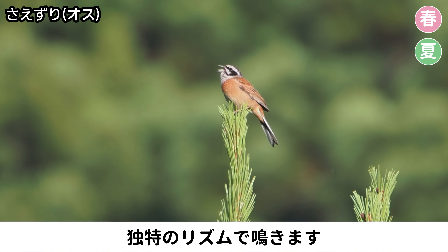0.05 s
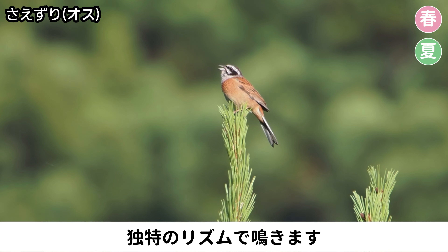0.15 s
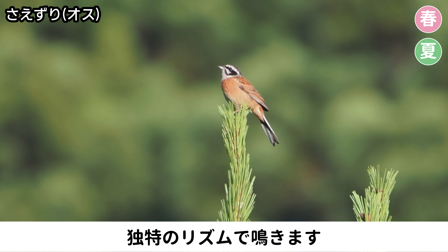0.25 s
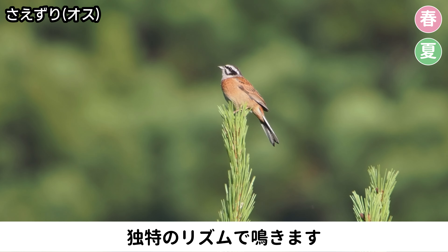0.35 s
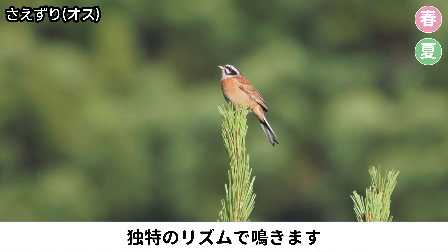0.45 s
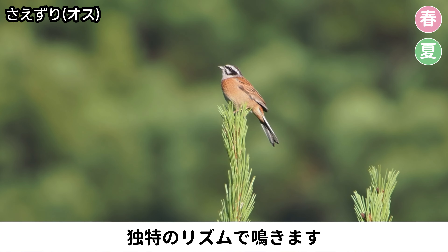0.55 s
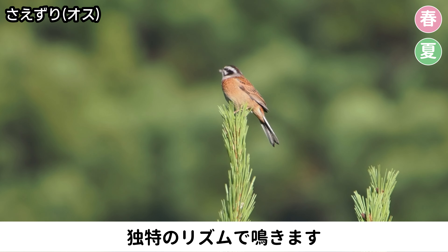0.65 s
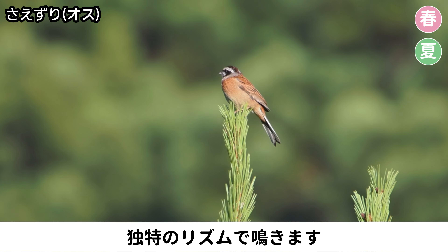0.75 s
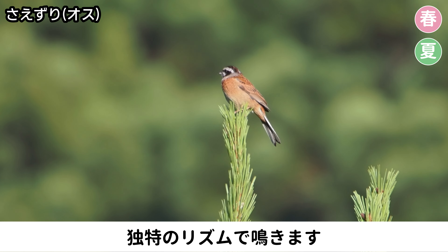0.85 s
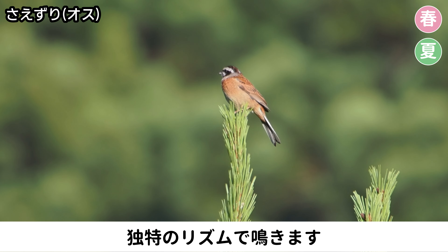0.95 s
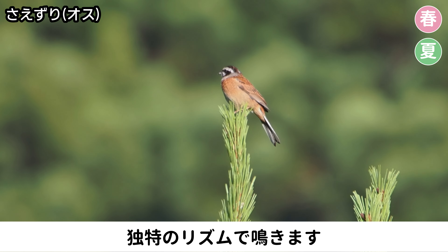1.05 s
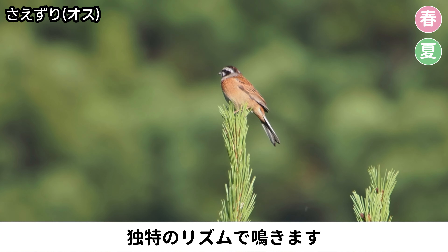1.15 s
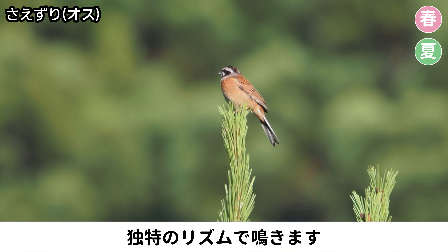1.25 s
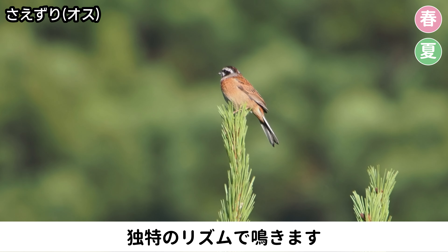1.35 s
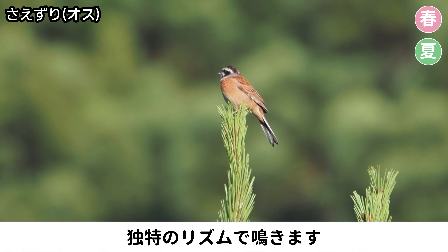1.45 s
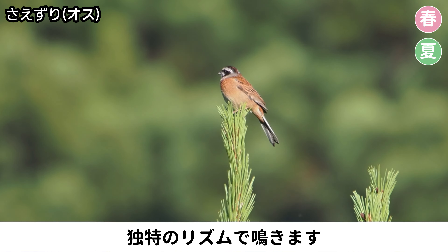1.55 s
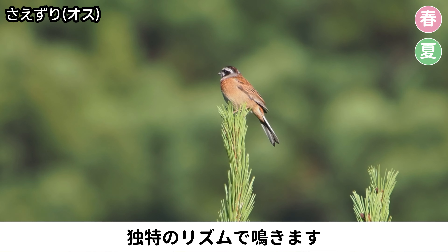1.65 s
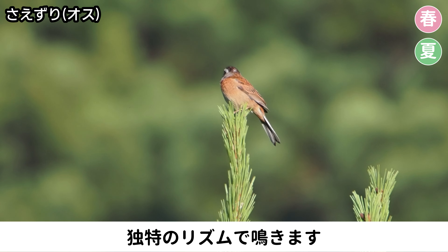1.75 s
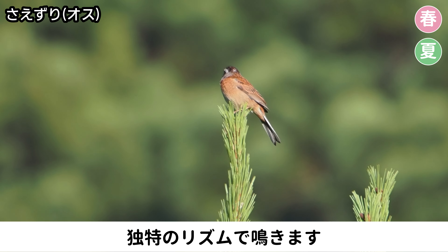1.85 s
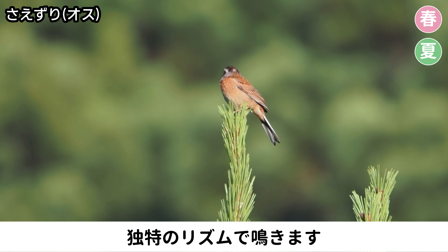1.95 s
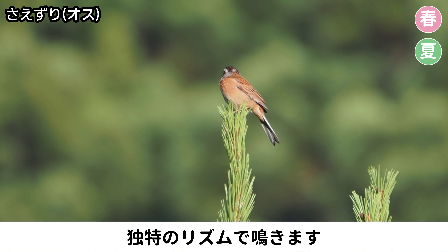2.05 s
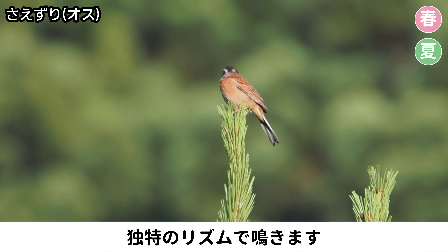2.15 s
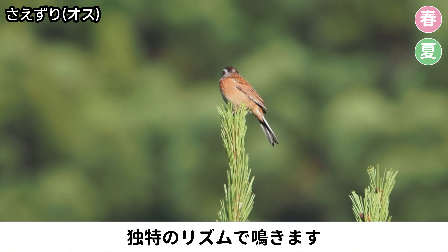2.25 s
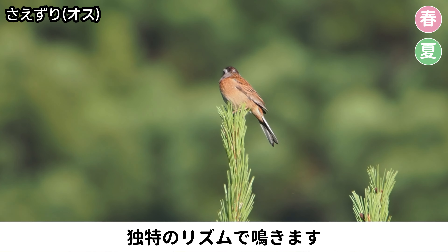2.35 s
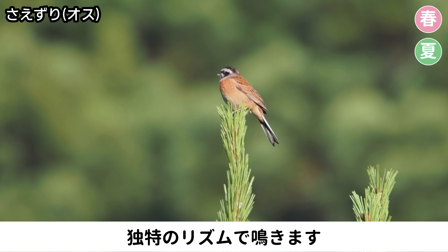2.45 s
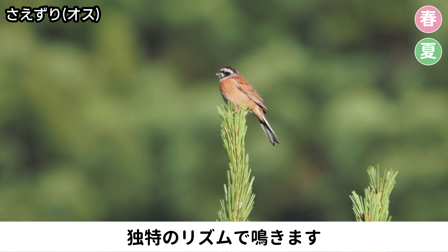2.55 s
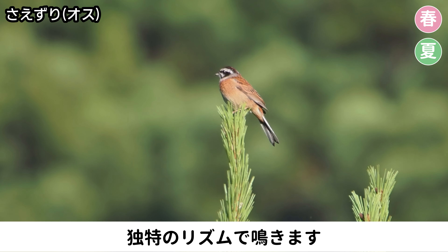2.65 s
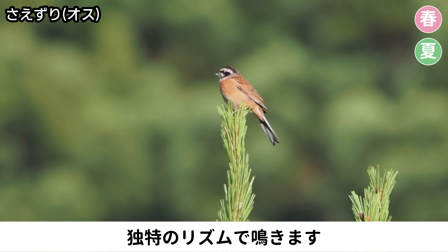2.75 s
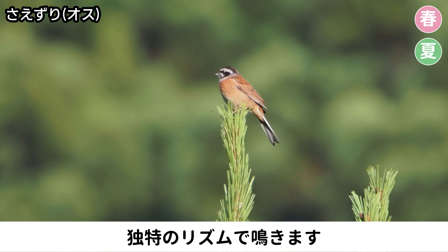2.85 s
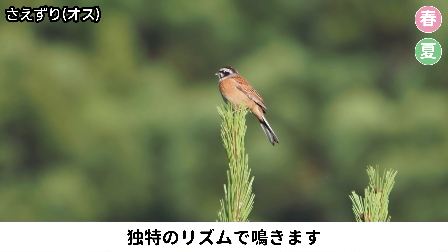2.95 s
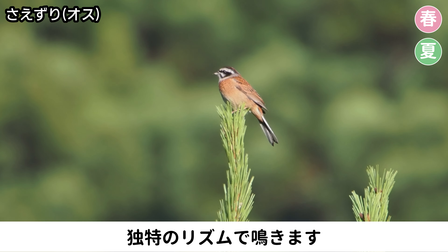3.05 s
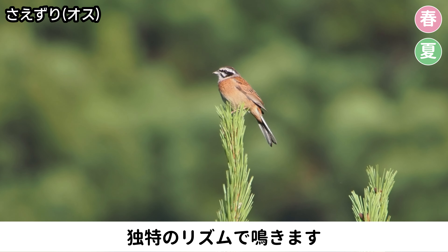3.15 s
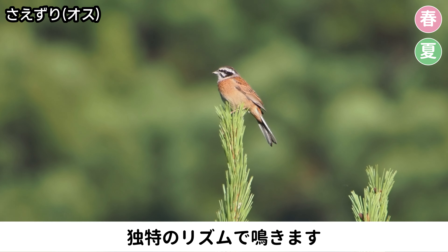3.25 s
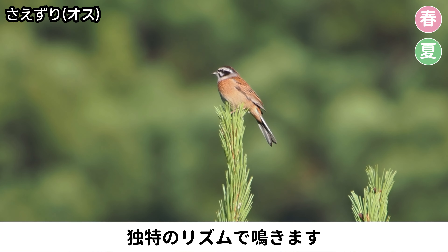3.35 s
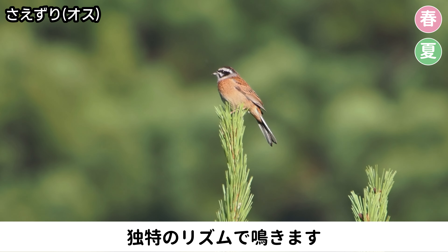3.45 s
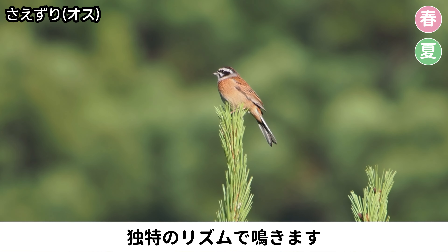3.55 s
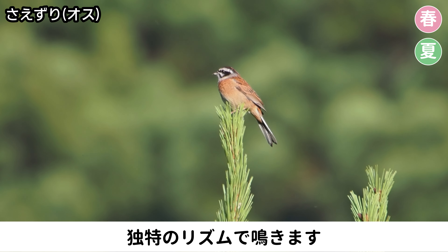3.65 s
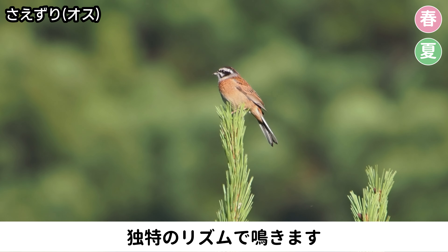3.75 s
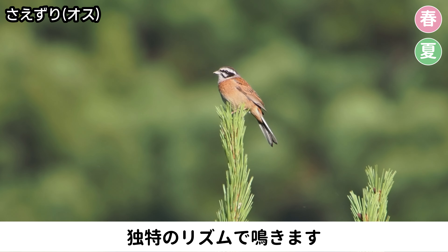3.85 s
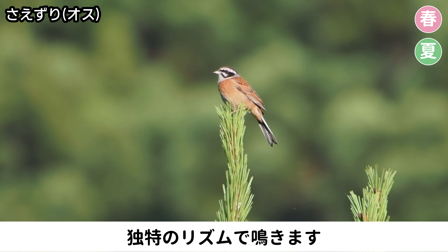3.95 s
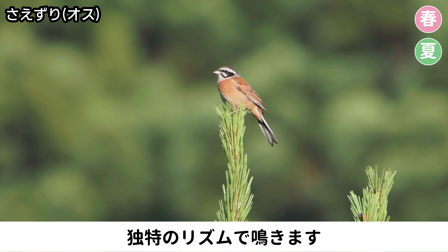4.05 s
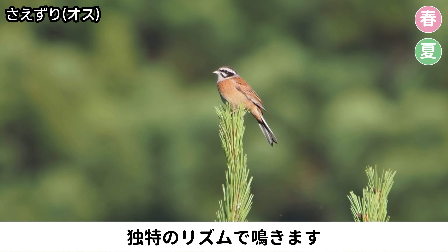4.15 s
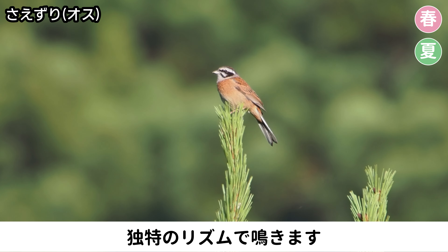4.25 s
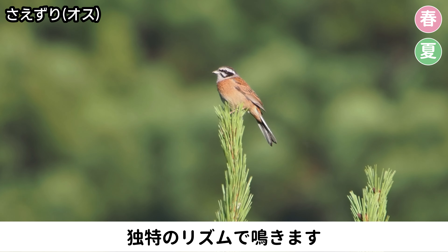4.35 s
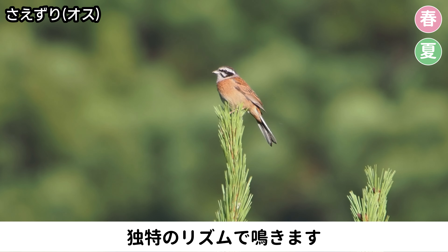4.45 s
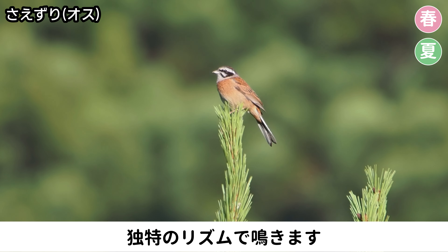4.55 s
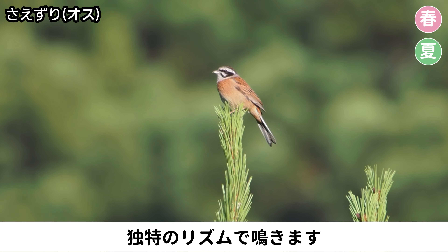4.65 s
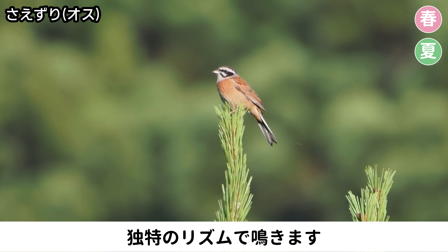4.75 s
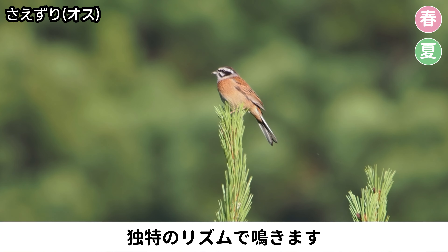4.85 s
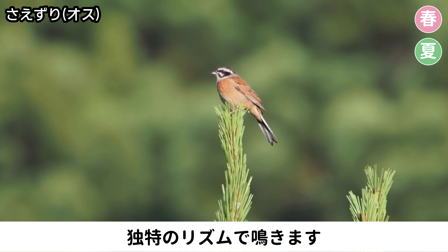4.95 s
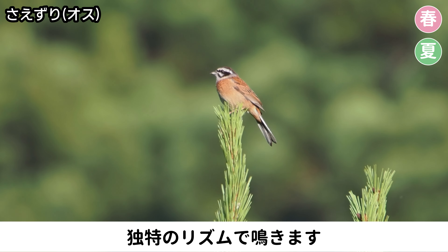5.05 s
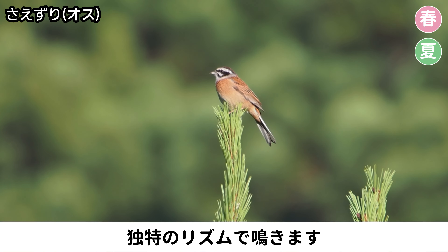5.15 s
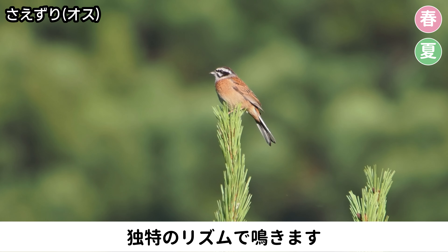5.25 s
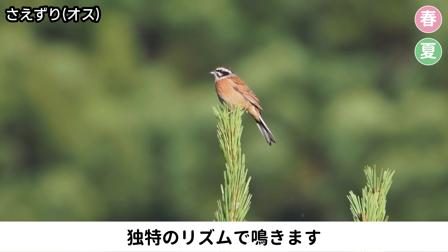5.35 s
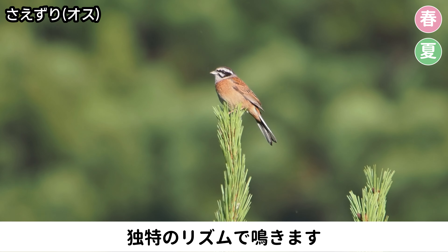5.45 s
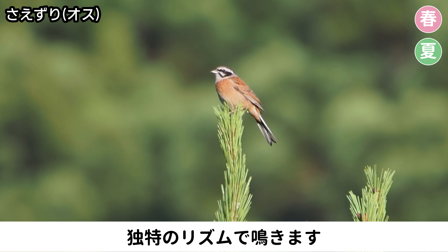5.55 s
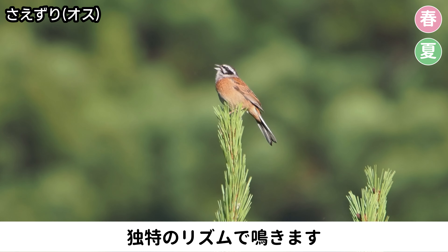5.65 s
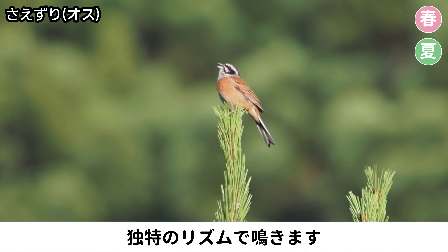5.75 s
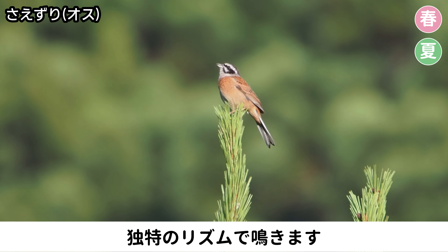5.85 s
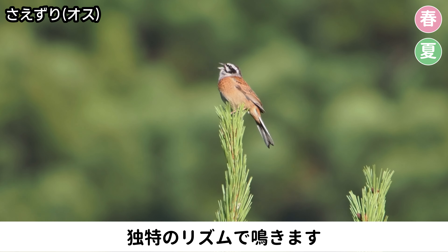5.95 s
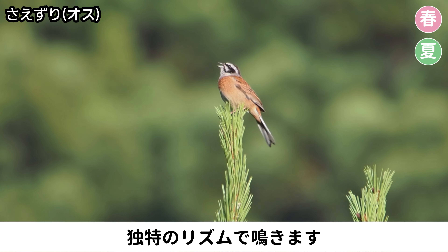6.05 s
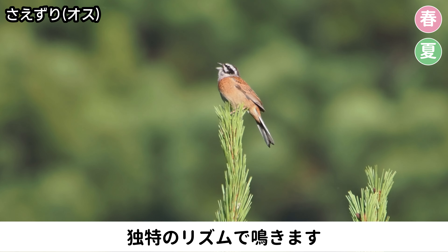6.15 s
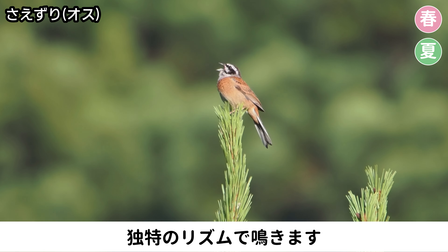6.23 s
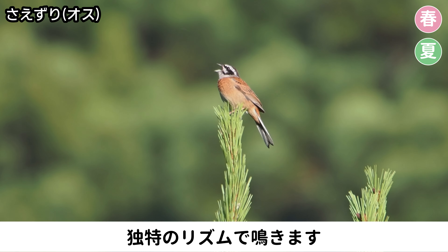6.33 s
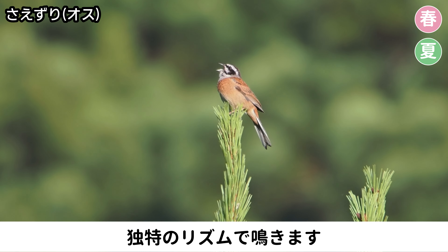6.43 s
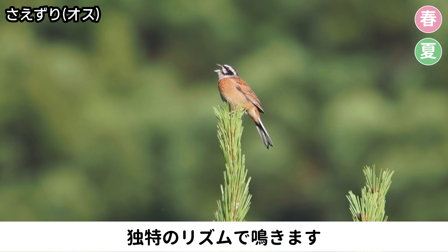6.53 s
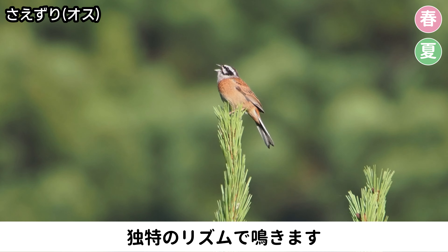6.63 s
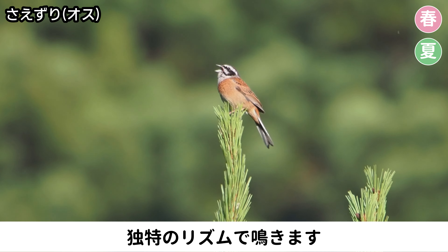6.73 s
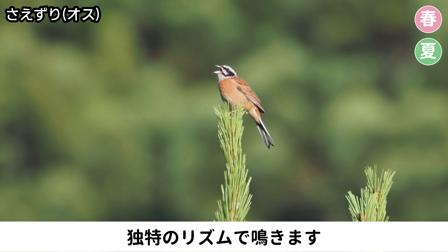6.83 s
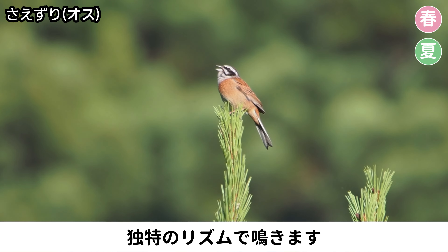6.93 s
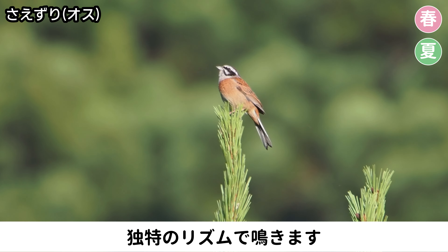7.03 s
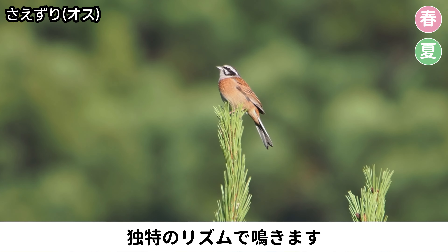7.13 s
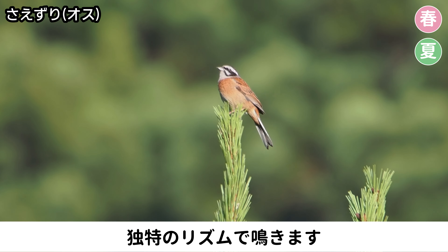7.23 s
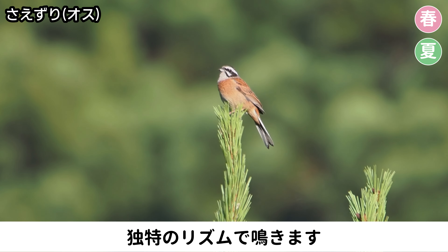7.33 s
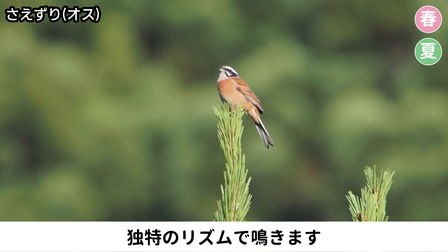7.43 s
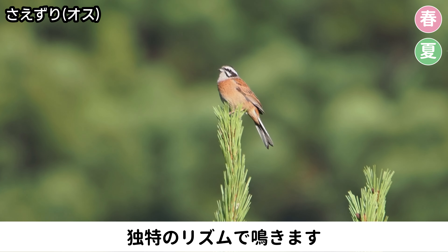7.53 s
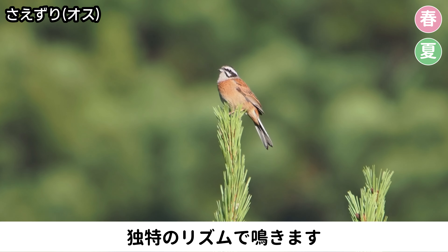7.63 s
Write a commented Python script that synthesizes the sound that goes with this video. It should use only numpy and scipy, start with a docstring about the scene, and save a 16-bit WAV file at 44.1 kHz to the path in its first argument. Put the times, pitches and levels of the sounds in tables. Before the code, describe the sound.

A wooded hillside in stereo: a steady mid-high airy rush, thin hiss above, and soft low rumble whose deepest part swells gently around 5.3 s. At 0 s a bunting is ending its phrase with two quick ticks and a trilled flourish, done by about 0.3 s, leaving a short leafy echo. Through the long pause, very faint far birds give upward whistles and sweeping notes, with small thin high buzzes scattered from 1 to 6.2 s, all smeared by trees. From 4.4 to 5.3 s six soft low hoots quicken slightly. At 5.35 s another bird gives a lower chirp, then a short toot. At 5.8 s the bunting sings its whole phrase, loud and clear: two down-slurred chews, rising swoops, a flick, a wavering high note, dry ticks and a trilled flourish, ending about 7.2 s. Echo fades under faint whistles until the end.

```python
"""On a wooded hillside a bunting sings from a pine top: the end of one phrase, a long pause, a whole phrase.
Its song is gliding, nearly pure tones; another bird gives a lower chirp and a toot just before the second phrase.
Far birds whistle and hoot as near-sinusoids, and buzz by frequency modulation. Decaying noise, convolved with
every note, is the scatter from foliage. Shaped noise gives the low rumble and a steady rush with a thin hiss on top."""
import sys
import numpy as np
from scipy import signal
from scipy.fft import rfft, irfft
from scipy.io import wavfile
from scipy.ndimage import uniform_filter1d

SR = 44100
rng = np.random.default_rng(int(sys.argv[2]) if len(sys.argv) > 2 else 0)


def generate_wav(sig):
    """Save sig (samples, or channels by samples) to the path in sys.argv[1] as 16-bit PCM at SR."""
    pcm = np.round(np.clip(np.atleast_2d(sig).T, -1, 1) * 32767).astype(np.int16)
    wavfile.write(sys.argv[1], SR, pcm)


N = 339129
LEAD = SR // 2  # samples of song before time zero, so that its echoes are already under way

# The bunting's phrase: (t/s into the phrase, syllable or note, pitch factor, length factor, relative level/dB)
PHRASE = [ (0, "chew", 1, 1, 0), (.277, "chew", .962, 1.08, 1.5), (.458, "swoop", 1, 1, 0),
          (.6055, "flick", 1, 1, 0), (.674, "swoop", .996, 1, -1), (.883, "wave", 1, 1, 0),
          (1.0005, "chip", 1, 1, 0), (1.053, "tick", 1, 1, 0), (1.107, "tick", 1.005, 1, 0),
          (1.1775, "flourish", 1, 1, 0)]
# Onsets of the phrase, sung twice; the first is already ending at time zero: (t/s)
PHRASE_STARTS_S = [-1.0672, 5.783]
# Notes sung as one syllable; a doubled note is the second side of the syrinx, higher and softer:
# name: (t/s after onset, note, pitch factor, relative level/dB)
SYLLABLES = { "chew": [(0, "pip", 1, 0), (.029, "slur", 1, 0)], "swoop": [(0, "tsip", 1, 0),
             (0, "tsip", 1.125, -6), (.016, "tsee", 1, 0), (.0385, "rise", 1, 0)],
             "flourish": [(0, "dip", 1, 0), (0, "dip", 1.19, -3), (.038, "trill", 1, 0),
             (.074, "tail", 1, 0)]}


def song():
    """Hierarchy of song: each phrase unfolds into syllables, each syllable into notes."""
    notes = []
    for start in PHRASE_STARTS_S:
        for s, name, pitch, length, db in PHRASE:
            if start + s <= -LEAD / SR:
                continue
            for lag, note, interval, note_db in SYLLABLES.get(name, [(0, name, 1, 0)]):
                notes.append((start + s + lag * length, note, pitch * interval, length, db + note_db))
    return notes


# Direction of the singer by pitch: (f/Hz, left minus right level/dB)
SINGER_PAN = [(3600, -2.6), (4100, -1.8), (4400, 0), (4700, .7), (5000, -.6), (6300, .8), (8000, .4)]


def singer():
    """Strong direct sound: the bunting's whistles stand well above their scatter."""
    whistles = syrinx(song(), SINGER_PAN, octave_db=-43)
    return woods(whistles, twigs_db=-11, trees_db=-16.0, twigs_t60=0.084, trees_t60=1.0)


# A bird some way off: (t/s, note, pitch factor, length factor, relative level/dB)
NEIGHBOUR = [(5.355, "chirp", 1, 1, 0), (5.414, "toot", 1, 1, 0)]


def neighbour():
    """Weaker direct-to-reverberant ratio: a bird some way off gives a chirp and a toot amid more scatter."""
    whistles = syrinx(NEIGHBOUR, [(1700, -1.5), (2600, -2.5)], waver=0.0051)
    return woods(whistles, twigs_db=-4.5, trees_db=-6.5, twigs_t60=0.25, trees_t60=1.6)


# Notes whose pitch flutters at the start: note: flutter depth f/Hz
FLUTTER_HZ = {"trill": 150, "sweep": 190}


def syrinx(notes, pan_points, waver=0.0048, shimmer_db=1.15, octave_db=-44, flutter_hz=205, flutter_s=0.035):
    """Near-sinusoidal oscillation: a fundamental and faint octave, with wavering pitch and shimmering level."""
    out = np.zeros((2, LEAD + N))
    for s, note, pitch, length, db in notes:
        t, hz, loud = gesture(note, pitch, length)
        # full depth for the first half of flutter_s, then fading out
        flutter_fade = np.clip(2 - 2 * t / flutter_s, 0, 1)
        flutter = FLUTTER_HZ.get(note, 0) * np.sin(2 * np.pi * flutter_hz * t) * flutter_fade
        phase = phase_of(hz * (1 + waver * walk(600, len(t))) + flutter)
        tone = np.sin(phase) + undb(octave_db) * np.sin(2 * phase)
        shimmer = undb(db + shimmer_db * walk(252, len(t)))
        add(out, s, tone * loud * shimmer * pan(at_pitch(pan_points, hz)))
    return out


# Simple notes, each one bowed glide, before pitch and length factors:
# note: (length t/s, start f/Hz, end f/Hz, bow f/Hz, relative level/dB, attack t/s, release t/s)
GLIDES = { "tick": (.017, 4900, 4030, 60, -12.8, .0025, .003),
          "chip": (.0145, 4850, 4280, -220, -14, .0025, .003),
          "tsip": (.0165, 8620, 7020, -150, -17.3, .0085, .004),
          "tsee": (.02, 8380, 7050, 80, -16.8, .013, .002),
          "flick": (.01, 3200, 5050, 200, -13, .004, .003),
          "dip": (.021, 8750, 8750, -1200, -27.5, .008, .008),
          "tail": (.114, 4140, 3860, 10, -20.9, .021, .036),
          "toot": (.031, 1720, 1695, -20, -28.5, .004, .01),
          "lift": (.07, 3430, 4470, 150, -34.8, .012, .016),
          "arch": (.095, 4350, 3500, 780, -34, .005, .002),
          "whistle": (.125, 5100, 4880, -60, -42, .012, .03), "buzz": (.11, 8250, 8600, 20, -43, .03, .03),
          "hoot": (.088, 864, 878, -5, -49.8, .024, .03)}
# Target pitches of the longer notes, before pitch and length factors: note: (t/s after onset, f/Hz)
TURNS = { "pip": [(0, 4060), (.013, 4300), (.0155, 4200), (.019, 3400)], "slur": [(0, 3200), (.0045, 5680),
         (.008, 4980), (.019, 4830), (.039, 4030), (.049, 3790), (.073, 3650)], "rise": [(0, 3620),
         (.018, 3790), (.036, 4270), (.052, 4490), (.07, 4760), (.102, 5320), (.107, 3400)],
         "wave": [(0, 7200), (.029, 7780), (.0425, 6800), (.061, 7450), (.077, 6620)], "trill": [(0, 5600),
         (.005, 6050), (.013, 6420), (.03, 6230), (.038, 4550), (.044, 4100)], "chirp": [(0, 3380),
         (.007, 2220), (.014, 2090), (.022, 2200), (.033, 2830), (.044, 2830)], "sweep": [(0, 4360),
         (.035, 5000), (.062, 5800), (.085, 6200), (.1, 5850), (.11, 4600)]}
# Loudness of the longer notes: note: (relative level/dB, attack t/s, release t/s, depth of swell and fade level/dB)
SWELLS = {"pip": (-16.3, .012, .003, 12), "slur": (-12.8, .019, .036, 7.5), "rise": (-11.1, .038, .002, 17),
          "wave": (-15.2, .041, .004, 16), "trill": (-16.3, .014, .009, 14), "chirp": (-14, .032, .011, 17),
          "sweep": (-34.3, .005, .07, 5.5)}
FADE_DB = 15  # depth of swell and fade of the simple notes


def pitch_path(note, length):
    """Frequency trajectory: a parabolic bow or straight slides, with level, attack, release and fade depth."""
    def clock(s):
        return np.arange(max(int(s * length * SR), 8)) / SR

    if note in GLIDES:
        s, start, end, bow, *swell = GLIDES[note]
        t = clock(s)
        u = t / t[-1]
        hz = start + (end - start) * u + bow * (1 - (2 * u - 1) ** 2)
        return t, hz, (*swell, FADE_DB)
    s, hz = np.transpose(TURNS[note])
    t = clock(s[-1])
    return t, np.interp(t / length, np.maximum.accumulate(s), hz), SWELLS[note]


# Every note sags while it is held and weakens where its pitch moves fast
SAG_DB_PER_S, SLIDE_LOSS_DB, FAST_OCTAVES_PER_S = 55, 4.5, 50


def gesture(note, pitch, length, glide_s=0.0021, edge_s=0.00116):
    """Amplitude envelope and glide: attack, sagging hold, release; the muscles round every corner."""
    def smooth(curve):
        return uniform_filter1d(curve, max(int(glide_s * SR), 1), mode="nearest")

    def ramp(s, span_s):
        return np.clip(s / max(span_s, 1 / SR), 0, 1)

    t, hz, (db, attack_s, release_s, fade_db) = pitch_path(note, length)
    hz = smooth(hz * pitch)
    left = t[-1] - t
    db = db - fade_db * (2 - ramp(t, attack_s * length) - ramp(left, release_s * length))
    db = db - SAG_DB_PER_S * np.maximum(t - attack_s * length, 0)
    speed = np.gradient(np.log2(hz)) * SR  # octaves per second
    db = db - SLIDE_LOSS_DB * np.tanh((speed / FAST_OCTAVES_PER_S) ** 2)
    return t, hz, undb(smooth(db)) * ramp(np.minimum(t, left), edge_s)


# Whistles of far birds: (t/s, note, pitch factor, length factor, relative level/dB)
FAR = [ (.44, "whistle", .62, .9, 4), (.545, "whistle", 1, 1, 0), (.81, "lift", .87, 1.15, -.5),
       (1.152, "lift", 1.01, 1, .3), (1.245, "lift", .97, .8, -5), (1.495, "arch", 1, 1.05, -1),
       (2.27, "lift", .98, 1, -4), (2.635, "sweep", 1, 1, 1), (2.835, "lift", 1.11, .85, -3.5),
       (2.958, "chip", .8, .8, -20), (3.035, "chip", .8, 1, -17.5), (3.172, "chip", .8, .8, -20.5),
       (3.635, "lift", 1.02, .9, -2), (3.975, "sweep", 1, 1.1, 0), (4.16, "lift", 1, .85, -3),
       (4.925, "sweep", 1, 1, -1.5), (5.265, "lift", .88, .7, -3), (6.815, "lift", .86, 1, 1.5),
       (7.195, "lift", .98, 1, 1.5), (7.54, "arch", 1, 1.08, 0), (7.625, "whistle", .82, .7, 11),
       (7.645, "lift", 1, 1.2, 7)]


def far_birds():
    """Low direct-to-reverberant ratio: far whistles, buzzes and hoots reach the ear nearly drowned in scatter."""
    whistles = syrinx(FAR, [(4000, -3), (5000, 11.5)], waver=.005, shimmer_db=1.5, flutter_hz=260, flutter_s=.1)
    whistles = bounce(whistles, delay_s=.026, db=-13)
    calls = whistles + buzzes() + hoots()
    return undb(-2) * woods(calls, twigs_db=-4.0, trees_db=-3.5, twigs_t60=0.24, trees_t60=1.0)


def bounce(x, delay_s, db):
    """Specular reflection: one distinct late copy doubles every glide."""
    late = np.pad(x, ((0, 0), (int(abs(delay_s) * SR), 0)))[:, :x.shape[1]]
    return x + undb(db) * late


# Onsets of one thin buzzy call: (t/s)
BUZZ_TIMES_S = [1.02, 1.21, 1.42, 1.65, 2.61, 3.32, 3.66, 4.12, 4.52, 4.94, 5.43, 5.91, 6.1]


def buzzes(beat_hz=1120, index=1.45, waver=0.0097, low_db=2, level_db=-3.6,
           pitch_spread=.015, length_spread=.15, spread_db=1.2):
    """Frequency modulation: a second vibration splits a high whistle into side tones; no two calls quite alike."""
    out = np.zeros((2, LEAD + N))
    variations = rng.standard_normal((len(BUZZ_TIMES_S), 3))
    for s, (sharp, long, strong) in zip(BUZZ_TIMES_S, variations):
        t, hz, loud = gesture("buzz", 1 + pitch_spread * sharp, np.exp(length_spread * long))
        beat = phase_of(beat_hz * (1 + waver * walk(200, len(t))))
        carrier = phase_of(hz * (1 + waver * walk(290, len(t))))
        tone = np.sin(carrier + index * np.sin(beat))
        # it is loudest at the bottom of each pitch swing
        level = undb(level_db + spread_db * strong - low_db * np.cos(beat))
        add(out, s, tone * loud * level * pan(0))
    return out


# The hoots come in one run that quickens, climbs and soon reaches full strength
HOOT_START_S, HOOT_GAP_S, HOOT_GAP_RATIO = 4.44, .18, .94
HOOT_CLIMB, HOOT_FIRST_DB = .0045, -6  # pitch rise per hoot (fraction), level of the first hoot


def hoots(count=6):
    """Pure tones in geometric timing: soft low notes, each a little sooner, shorter and higher than the last."""
    out = np.zeros((2, LEAD + N))
    s = HOOT_START_S
    for k in range(count):
        t, hz, loud = gesture("hoot", 1 + HOOT_CLIMB * k, HOOT_GAP_RATIO ** (k / 2))
        level = undb(HOOT_FIRST_DB * np.exp(-k))
        add(out, s, np.sin(phase_of(hz)) * loud * level * pan(-1.5))
        s += HOOT_GAP_S * HOOT_GAP_RATIO ** k
    return out


# Foliage colours the echoes: (f/Hz, level/dB)
ECHO_COLOUR = [(1700, 1.5), (3600, 1), (4500, 1.5), (5300, 0), (6300, 0), (7200, 1.5), (9000, 0.5)]


def woods(x, twigs_db, trees_db, twigs_t60, trees_t60, onset_s=0.0064):
    """Reverberation by convolution: direct sound, quick scatter from branches, a long thin tail from trees."""
    t = np.arange(int(1.5 * SR)) / SR
    response = np.zeros((2, len(t)))
    # early echoes still come from near the bird, late ones from all round
    for db, t60, spread in ((twigs_db, twigs_t60, .55), (trees_db, trees_t60, .85)):
        decay = np.exp(-np.log(1000) * t / t60) * (1 - np.exp(-t / onset_s))
        mid, side = rng.standard_normal((2, len(t))) * decay
        echoes = np.array([mid + spread * side, mid - spread * side])
        response += undb(db) * echoes / np.sqrt(np.sum(echoes ** 2, axis=1, keepdims=True))
    hz = np.arange(len(t) // 2 + 1) * SR / len(t)
    response = irfft(rfft(response) * undb(at_pitch(ECHO_COLOUR, hz)), len(t))
    scatter = signal.fftconvolve(x.mean(axis=0)[None], response, axes=1)[:, :x.shape[1]]
    return (x + scatter)[:, LEAD:]


# Spectrum of the low rumble: (f/Hz, relative level per Hz/dB)
RUMBLE = [(12, -32), (20, -3), (38, 0.5), (50, -1.5), (69, -11.5), (96, -5), (125, -16.5), (176, -12),
          (225, -28), (298, -20), (456, -26.5), (643, -19.5), (808, -19), (877, -22), (1000, -30),
          (1300, -63), (2200, -120)]
RUMBLE_DB = -49.5  # level before its deepest part swells
RUMBLE_SWELL_S, RUMBLE_SWELL_WIDTH_S, RUMBLE_SWELL_DB = 5.3, 1, 2.8


def rumble(bass_hz=130):
    """Band-limited noise: a low outdoor rumble whose deepest part swells once, slowly."""
    t = np.arange(N) / SR
    swell = np.exp(-((t - RUMBLE_SWELL_S) / RUMBLE_SWELL_WIDTH_S) ** 2)
    noise = air(RUMBLE, RUMBLE_DB, swell_db=0.25)
    bass = signal.sosfiltfilt(signal.butter(2, bass_hz, fs=SR, output="sos"), noise)
    return noise + bass * (undb(RUMBLE_SWELL_DB * swell) - 1)


# Spectrum of the hillside's rush and the thin hiss above it: (f/Hz, relative level per Hz/dB)
RUSH = [(590, -54), (1000, -18), (1240, -8.5), (1790, 0), (2010, 0), (2740, 1), (3300, -2), (3570, -2),
        (4150, -3.5), (4870, -6), (6410, -12), (7270, -13.5), (8940, -18), (15000, -12.5), (15500, -15)]
RUSH_DB = -37.1


def rush():
    """Broadband noise: the steady rush of the wooded hillside."""
    return air(RUSH, RUSH_DB, swell_db=0.13)


# Stereo width of the background: (f/Hz, side minus mid level/dB)
WIDTH = [(60, -21), (110, -15), (200, -5), (380, -2), (700, -5), (1290, -7.5), (2380, -8.5), (4400, 0.5),
         (8120, 2), (15000, -2)]
# Stereo balance of the background: (f/Hz, left minus right level/dB)
LEAN = [(60, -0.5), (110, -0.5), (200, 1), (380, -1.5), (700, -2.5), (1290, -2.5), (2380, -1.0), (4400, -1),
        (8120, -0.5), (15000, 0.0)]


def air(spectrum, db, swell_db):
    """Spectral shaping of noise: alike in both ears in the bass, wide in the treble, swelling slightly."""
    hz = np.arange(N // 2 + 1) * SR / N
    mid, side = rfft(rng.standard_normal((2, N))) * undb(at_pitch(spectrum, hz))
    side = side * undb(at_pitch(WIDTH, hz))
    both = irfft(np.array([mid + side, mid - side]) * pan(at_pitch(LEAN, hz)), N)
    return both / np.std(both.mean(axis=0)) * undb(db + swell_db * walk(4.32, N))


def undb(db):
    """Logarithmic level: decibels to gain."""
    return 10 ** (np.asarray(db) / 20)


def at_pitch(points, hz):
    """Logarithmic pitch: read (f/Hz, value) points on a log-frequency axis."""
    f, value = np.transpose(points)
    return np.interp(np.log(np.maximum(hz, 1)), np.log(f), value)


def pan(db):
    """Interaural level difference: left and right gains."""
    return undb(np.array([[1], [-1]]) * db / 2)


def walk(rate, size):
    """Low-pass random process: a smooth wander of spread near 1."""
    k = max(int(SR / rate), 1)
    held = np.repeat(rng.standard_normal(size // k + 1), k)
    return uniform_filter1d(held, k)[:size]


def phase_of(hz):
    """Phase as the integral of frequency."""
    return 2 * np.pi * np.cumsum(hz) / SR


def add(track, s, sound):
    """Superposition: mix a stereo sound into a track that begins LEAD samples before time zero."""
    i = max(int(s * SR) + LEAD, 0)
    part = sound[:, :max(track.shape[1] - i, 0)]
    track[:, i:i + part.shape[1]] += part


def scene():
    """Superposition: the singer close by, the other birds deeper in the trees, and the hillside."""
    return singer() + neighbour() + far_birds() + rumble() + rush()


def record(dry):
    """Band limitation: the recorder cuts the top steeply, by an elliptic low-pass filter."""
    return signal.sosfilt(signal.ellip(12, .1, 80, 15750, fs=SR, output="sos"), dry)  # cutoff in Hz


dry = scene()
out = record(dry)
generate_wav(out)
```